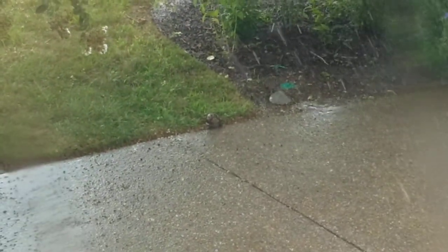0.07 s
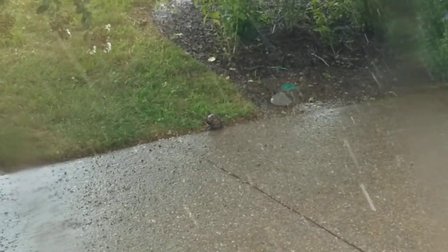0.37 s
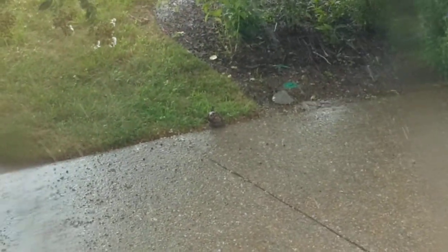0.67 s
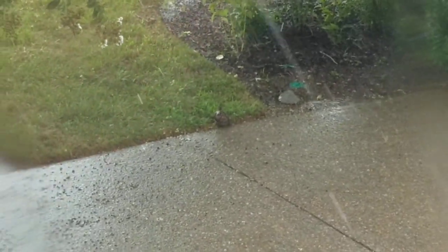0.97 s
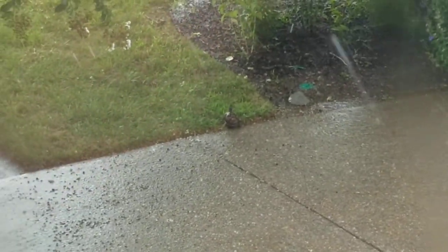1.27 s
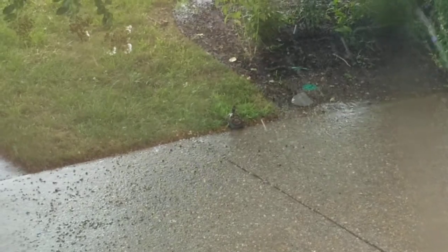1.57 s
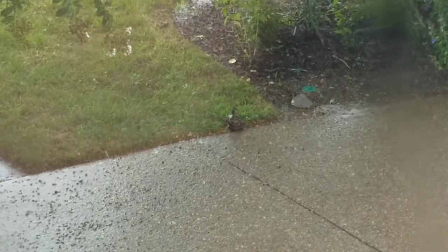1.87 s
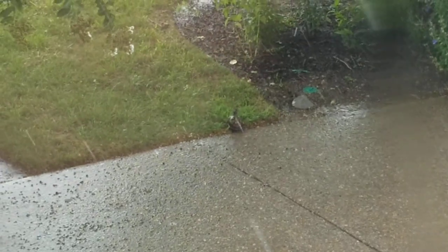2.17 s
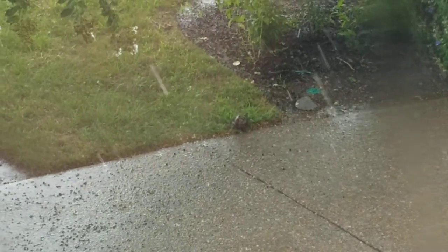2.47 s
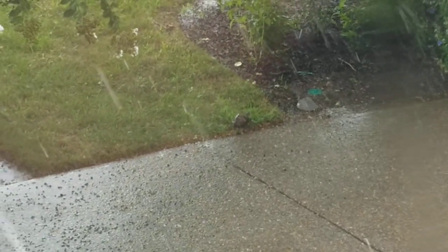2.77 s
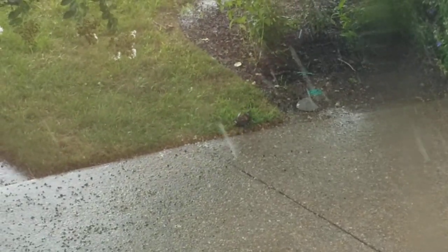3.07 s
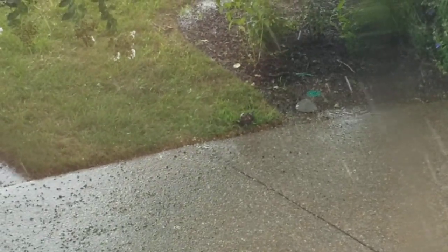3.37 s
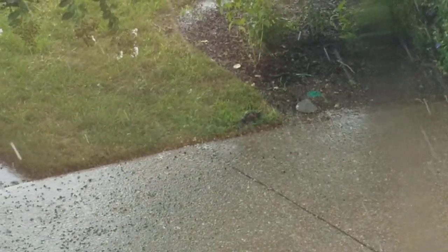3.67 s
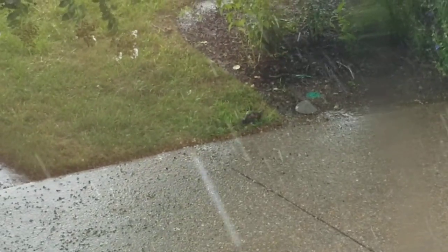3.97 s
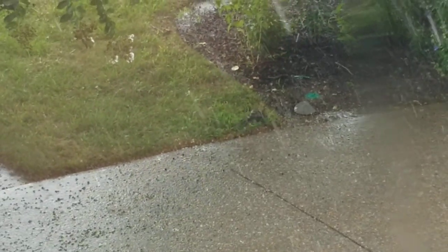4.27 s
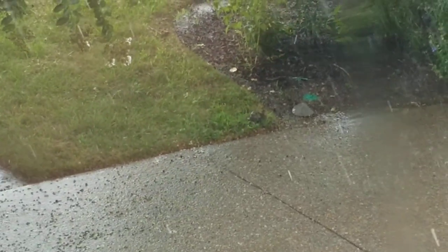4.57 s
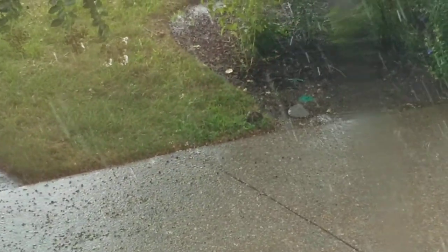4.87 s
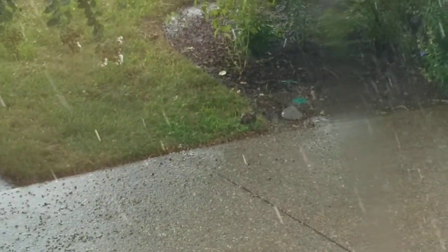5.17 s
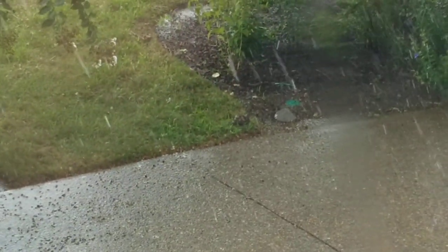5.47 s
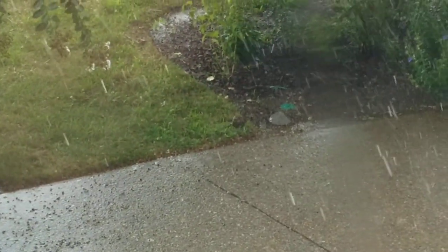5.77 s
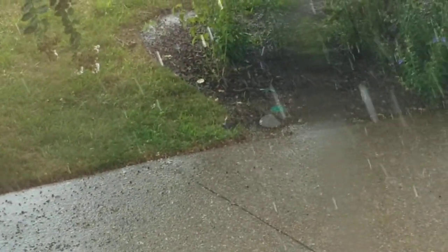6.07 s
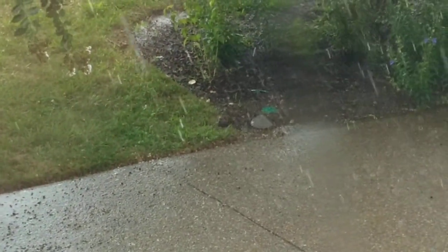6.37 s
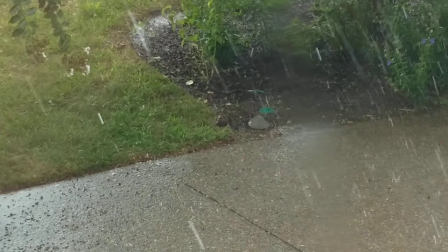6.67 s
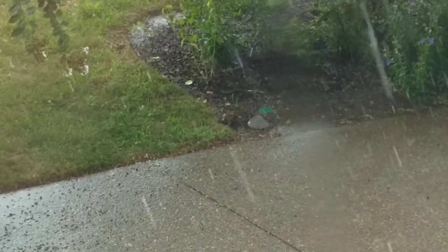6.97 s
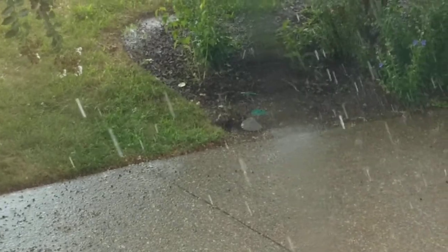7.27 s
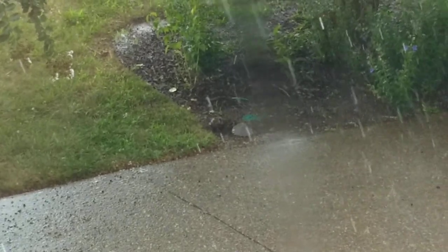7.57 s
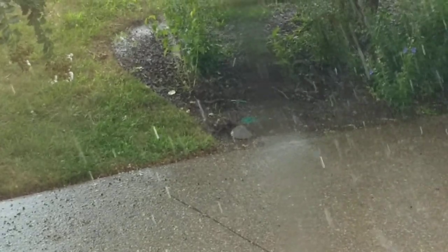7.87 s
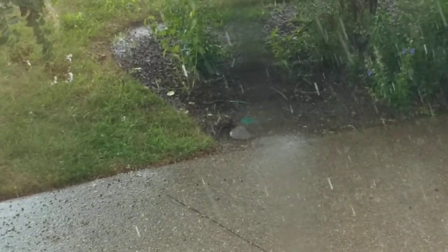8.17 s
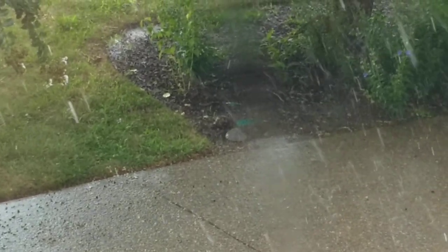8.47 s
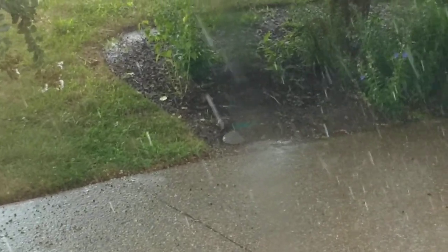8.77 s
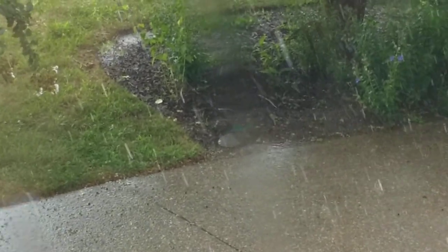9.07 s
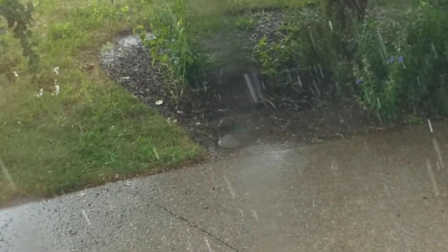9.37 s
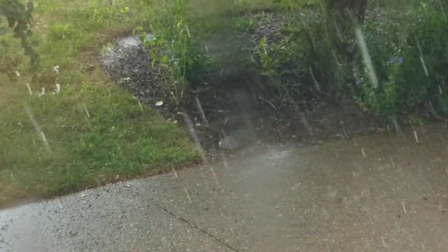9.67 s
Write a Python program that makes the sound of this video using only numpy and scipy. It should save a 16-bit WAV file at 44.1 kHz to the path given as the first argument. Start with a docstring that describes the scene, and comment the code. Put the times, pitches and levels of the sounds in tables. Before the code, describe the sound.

Heavy rain falls steadily, heard from a room behind a closed window. A hollow, throbbing rumble fills the room while drops patter dully on the pane and spray hisses softly on the driveway. Faint splats and plinking drips come now and then, over a barely audible appliance hum. Later the rain swells a little, and the hand-held microphone picks up a tick and knock, then several soft thuds.

```python
"""A room behind a closed window, in steady heavy rain that swells a little towards the end.
Countless impacts on the house excite the room's standing waves into a hollow, throbbing rumble.
Drops patter at the window, whose pane dulls them and drones; spray hisses on the driveway, and
nearby fat drops splat and drips plink. Indoors an appliance hums, and a hand-held camera ticks
and thuds softly under shifting fingers."""
import sys
import numpy as np
from scipy import signal
from scipy.fft import rfft, irfft, next_fast_len
from scipy.io import wavfile
from scipy.ndimage import map_coordinates

SR = 44100
rng = np.random.default_rng(int(sys.argv[2]) if len(sys.argv) > 2 else 0)


def persist_wave(psi):
    """Save psi, clipped to +-1, as 16-bit WAV."""
    counts = np.round(np.clip(psi, -1, 1) * 32767).astype(np.int16)
    wavfile.write(sys.argv[1], SR, np.atleast_2d(counts).T)


N = 428652

# strength of the rain in the gusts, about its usual value: t/s, level/dB
RAIN_STRENGTH = [(0, -1.2), (0.35, -3), (0.8, -1.3), (1.05, -1.3), (1.35, -3.5), (2.0, -0.5), (2.5, -1.5),
                 (3.9, -1), (5.5, -0.25), (6.6, 0.2), (6.9, -0.6), (7.3, 2), (8.0, -0.6), (8.45, 0.5),
                 (9.72, 0)]
# spectra of the noise sources: f/Hz, relative spectral level/dB
MIC_HISS_SPECTRUM = [(20, 1), (8000, -1.5), (15500, 0)]
SPLASH_SPECTRUM = [(800, -19), (2100, -3.5), (2700, 1.5), (3400, -1.5), (5000, 0.5), (6000, 0),
                   (7000, -3.5), (8300, -7), (11000, -13), (15500, -21)]
PANE_SPECTRUM = [(300, -27), (460, 0), (740, -2), (950, -19), (2000, -60)]
PATTER_SPECTRUM = [(200, -19), (400, -9), (470, -0.5), (540, -.5), (640, -4), (760, -2), (870, -8.5),
                   (1150, -9.5), (1350, -15), (1530, -13), (1950, -19), (2600, -21), (4000, -50)]
DRUM_SPECTRUM = [(20, -70), (32, -39), (43, -19), (55, -9), (95, -6), (160, -6), (255, -6.5), (310, -8),
                 (400, -13), (600, -36.5), (1200, -67)]
# standing waves of the room, and resonances in the spray's hiss: f/Hz, width/Hz, lift/dB
ROOM_MODES = [(59.5, 5, 6), (98, 13, 8.5), (125, 7, 7), (142, 11, 8), (168, 7, 2.5), (187, 15, 6),
              (212, 14, 7), (241, 9, 7), (262, 12, 4.5), (303, 12, 3), (349, 14, 3), (465, 30, 1.5),
              (528, 20, 2.5)]
SPLASH_MODES = [(3830, 220, 5), (4360, 160, 7.5), (4600, 90, 3), (4850, 130, 4), (5550, 200, 2.5),
                (5900, 150, 1.5)]
# reverberation time of the room: f/Hz, t60/s
ROOM_DECAY = [(200, 0.75), (2000, 0.32), (10000, 0.046)]
# dry ticks at the camera, and fat drops near the window: t/s, level/dB, f/Hz, width/octaves, t60/s
CAMERA_TICKS = [(4.942, -53.5, 10200, .17, .05), (7.1402, -46, 14500, .5, .012),
                (7.1402, -44.5, 2800, 1, .007)]
SPLATS = [(.510, -57.5, 4200, .5, .09), (.795, -56.5, 1550, .2, .09), (.801, -58, 5600, .15, .04),
          (.910, -60, 6050, .07, .03), (1.683, -59.5, 5600, .25, .05), (1.867, -53.5, 1300, .3, .1),
          (1.983, -57, 7400, .18, .04), (2.051, -56, 4900, .45, .13), (2.237, -58, 1550, .25, .16),
          (3.224, -56.5, 1700, .18, .08), (3.340, -53, 1350, .25, .07), (3.668, -59.5, 3750, .12, .09),
          (4.489, -55, 5500, .5, .03), (4.519, -56, 1550, .25, .06), (4.572, -56.5, 1400, .35, .12),
          (4.633, -55, 1450, .3, .03), (5.690, -58, 4600, .18, .05), (5.780, -59.5, 3550, .15, .16),
          (6.240, -62, 3650, .14, .05), (6.323, -53.5, 1450, .4, .05), (6.6105, -49, 4500, .6, .015),
          (6.6125, -39, 1200, .8, .015), (6.620, -61, 3650, .2, .12), (6.626, -54, 1200, .4, .07),
          (7.093, -58, 5400, .25, .025), (7.238, -56, 5600, .2, .06), (7.663, -55.5, 5300, .27, .07),
          (8.165, -59.5, 3870, .05, .07), (8.169, -57, 5700, .12, .04), (8.415, -55, 1580, .26, .1),
          (9.213, -56, 1400, .25, .1)]
# finger nudges on the camera body: t/s, level/dB
NUDGES = [(3.235, -33), (7.1405, -20), (7.188, -24), (8.149, -26), (8.24, -29), (8.33, -29), (8.585, -28),
          (8.725, -28), (8.795, -28), (8.895, -27)]
# drips from the eaves: t/s, level/dB, f/Hz, t60/s
DRIPS = [(1.437, -48, 900, .025), (2.756, -46, 1240, .03), (4.368, -50.5, 1170, .04),
         (4.516, -42.5, 1120, .045), (4.632, -41, 590, .04), (5.239, -51, 1580, .04),
         (7.263, -44.5, 1190, .05), (7.283, -48, 1000, .04), (7.314, -38, 630, .04), (8.010, -40, 720, .03)]
# crests of single standing waves: t/s, level/dB, f/Hz
THROBS = [(.03, -46.5, 141), (.55, -52.5, 141), (.85, -52.5, 259), (.9, -53.5, 141), (1.05, -50, 241),
          (2.6, -50, 98), (3.22, -50, 98), (4.18, -50, 98), (4.32, -51, 141), (7.17, -49, 141),
          (7.58, -50, 212), (7.72, -49.5, 98), (8.45, -49, 212), (8.7, -49.5, 98), (9.43, -47.5, 141)]
# likeness of left and right before widening: f/Hz, coherence/1
COHERENCE = [(30, .2), (90, .45), (140, .6), (215, .8), (300, .58), (390, .6), (480, .9), (800, .89),
             (1150, .98), (1420, .5), (1700, -.1)]
# lead of left over right: f/Hz, phase/rad
PHASE_LEAD = [(50, 1.2), (75, -0.33), (140, 0.14), (215, -0.17), (300, 1.3), (400, 0.25), (850, 0.56),
              (1150, -0.057), (1450, -0.00038), (2000, -0.061)]
# left minus right: f/Hz, level/dB
BALANCE = [(100, 0), (250, 1.5), (500, 0), (1500, 0.7), (2500, -0.4), (5000, -1.1), (9000, -2),
           (14000, -2.5)]
# depth of the stereo-widening comb: f/Hz, depth/1
COMB_DEPTH = [(1600, 0.018), (2000, 0.97), (3500, 0.89), (5800, 0.74), (8000, 0.47), (11500, 0.65),
              (14500, 0.46)]
# teeth of that comb: f/Hz, spacing/Hz
COMB_SPACING = [(2300, 2320), (7000, 2345), (14400, 2400)]

OPPOSITE = np.array([[1], [-1]])  # signs for left and right
QUADRATURE = OPPOSITE * np.pi / 4  # phases a quarter cycle apart


def amp(db):
    """Amplitude ratio of a level in decibels."""
    return 10 ** (np.asarray(db) / 20)


def unit(x):
    """Normalisation to rms 1."""
    return x / np.sqrt(np.mean(x ** 2) + 1e-20)


def along(points, hz):
    """Interpolation of (f, value) points on a logarithmic frequency axis."""
    f, values = np.transpose(points)
    return np.interp(np.log(hz + 1), np.log(f + 1), values)


def wobble(rate):
    """Slow random modulation: a spline through rate knots a second."""
    knots = rng.standard_normal(int(N * rate / SR) + 4)
    return map_coordinates(knots, [np.arange(N) * rate / SR])


def noise():
    """White noise, incoherent between the channels."""
    return rng.standard_normal((2, N))


def filtered(x, response):
    """Linear filtering: the spectrum of x times a frequency response."""
    n = x.shape[-1]
    padded = next_fast_len(n + 8192)
    return irfft(rfft(x, padded) * response(np.fft.rfftfreq(padded, 1 / SR)), padded)[..., :n]


def coloured(x, spectrum, modes=()):
    """Source and filter: x takes a broad spectrum with a peak at each resonance, at rms 1."""
    def lift_db(hz):
        return sum(db / (1 + (2 * (hz - centre) / width) ** 2) for centre, width, db in modes)
    return unit(filtered(x, lambda hz: amp(along(spectrum, hz) + lift_db(hz))))


def add(track, s, sound):
    """Superposition of a sound on the track, from s seconds on."""
    part = track[:, round(s * SR):][:, :sound.shape[-1]]
    part += sound[..., :part.shape[-1]]


def bursts(rows):
    """Broadband transients: each impact is a band of noise that decays exponentially."""
    track, t = np.zeros((2, N)), np.arange(SR // 4) / SR
    for s, db, pitch, octaves, t60 in rows:
        band = lambda hz: np.exp(-.5 * (np.log2((hz + 1) / pitch) / octaves) ** 2)
        band_noise = unit(filtered(rng.standard_normal((2, len(t))), band))
        add(track, s, amp(db - 60 * t / t60) * band_noise)
    return track


def rings(rows, attack_s=.0004):
    """Damped free vibration: each impact rings at one frequency."""
    track, t = np.zeros((2, N)), np.arange(SR // 4) / SR
    for s, db, pitch, t60 in rows:
        envelope = amp(db - 60 * t / t60) * (1 - np.exp(-t / attack_s))
        add(track, s, envelope * np.sin(2 * np.pi * pitch * t + QUADRATURE))
    return track


def shower(count, low_hz, high_hz, t60, spread_db, samples):
    """Shot noise: drops ring briefly at random times and pitches, with a random phase at each ear."""
    t = np.arange(samples) / SR
    when, pitch, distance, *phases = rng.random((count, 5)).T[:, :, None]
    # most drops are far and faint, a few are near
    envelopes = amp(-spread_db * np.log(distance + 1 / 200) - 60 * t / t60)
    angle = 2 * np.pi * (low_hz + pitch * (high_hz - low_hz)) * t
    index = ((when * N).astype(int) + np.arange(samples)).ravel()
    ears = [envelopes * np.sin(angle + 2 * np.pi * phase) for phase in phases]
    return unit(np.array([np.bincount(index, ear.ravel(), N)[:N] for ear in ears]))


def flurries(count, spread_db, t60):
    """Incoherent energies add: a gain of rms 1 that jumps at each larger splash and sinks back."""
    when, distance = rng.random((count, 2)).T
    strength = amp(-spread_db * np.log(distance + 1 / 100))
    energy = np.bincount((when * N).astype(int), strength ** 2, N)
    retained = amp(-60 / (t60 * SR)) ** 2
    return unit(np.sqrt(signal.lfilter([1], [1, -retained], energy)))


def in_room(x, wet_db):
    """Reverberation: convolution adds a diffuse tail in which the treble dies first."""
    hz, t, spectra = signal.stft(rng.standard_normal((2, SR // 3)), SR, nperseg=256)
    decay = amp(-60 * t / along(ROOM_DECAY, hz)[:, None])
    _, tail = signal.istft(spectra * decay, SR, nperseg=256)
    echo = signal.fftconvolve(x, tail / np.linalg.norm(tail[0]), axes=1)[:, :N]
    return x + amp(wet_db) * echo


def microphones(air):
    """Partial coherence: two close ports hear low notes much alike; stereo widening combs the treble."""
    comb = lambda hz: along(COMB_DEPTH, hz) * np.cos(2 * np.pi * hz / along(COMB_SPACING, hz))
    coherence = lambda hz: np.clip(along(COHERENCE, hz) - comb(hz), -1, 1)
    mid_side = (air[0] + OPPOSITE * air[1]) / 2
    mid, side = filtered(mid_side, lambda hz: np.sqrt(1 + OPPOSITE * coherence(hz)))
    balance = lambda hz: amp(OPPOSITE * along(BALANCE, hz) / 2)
    phase_shift = lambda hz: np.exp(.5j * OPPOSITE * along(PHASE_LEAD, hz))
    return filtered(mid + OPPOSITE * side, lambda hz: balance(hz) * phase_shift(hz))


def microphone_hiss():
    """Self-noise of the microphones: a faint, nearly white floor."""
    return amp(-64.5) * coloured(noise(), MIC_HISS_SPECTRUM)


def appliance_hum(hz, db):
    """A pure tone, made unsteady by slight modulation of phase and amplitude."""
    phase = 2 * np.pi * hz * np.arange(N) / SR + 0.21 * wobble(1.9)
    return amp(db + 1.1 * wobble(3)) * np.sin(phase)


def camera_knock(s, db, hz, t60):
    """Heavy damping cuts the ring of the camera body to a dull knock."""
    return rings([(s, db, hz, t60)])


def finger_nudges(hz=125, attack_s=.002, t60=0.058, push=.3):
    """Structure-borne sound: a nudge shakes and pushes the camera, driving its ports in antiphase."""
    track, t = np.zeros((2, N)), np.arange(SR // 8) / SR
    envelope = amp(-60 * t / t60) * (1 - np.exp(-t / attack_s))
    thud = envelope * (np.sin(2 * np.pi * hz * t) + push)
    for s, db in NUDGES:
        add(track, s, amp(db) * OPPOSITE * thud)
    return track


def drips():
    """Damped oscillation: drips from the eaves plink or plop, with little reverberation."""
    return in_room(rings(DRIPS), wet_db=-12)


def splats():
    """Impact noise: fat drops burst close by and reverberate in the room."""
    return in_room(bursts(SPLATS), wet_db=-2)


def driveway_splashes(rain_db):
    """Superposition on driveway and leaves: even hiss, droplets, pings on something hard, and spray."""
    droplets = shower(count=6000, low_hz=3030, high_hz=10560, t60=0.0043, spread_db=3.0, samples=192)
    pings = shower(count=1800, low_hz=3300, high_hz=6300, t60=0.06, spread_db=1.0, samples=2000)
    spray = noise() * flurries(count=900, spread_db=2.0, t60=0.17)
    hiss = noise() + amp(-18) * droplets + amp(-16) * pings + amp(-4) * spray
    level_db = -60.5 + 0.7 * rain_db + 0.72 * wobble(9)
    return amp(level_db) * coloured(hiss, SPLASH_SPECTRUM, SPLASH_MODES)


def pane_drone(rain_db):
    """Forced vibration: gusts drive rain against the glass, whose drone grows steeply with them."""
    return amp(-61.5 + 2.6 * rain_db) * coloured(noise(), PANE_SPECTRUM, ROOM_MODES)


def window_patter(rain_db):
    """Transmission loss: the pane dulls the knocks of near drops and the wash of farther ones."""
    near = shower(count=1500, low_hz=880, high_hz=1904, t60=0.014, spread_db=2.5, samples=800)
    level_db = -52 + 0.71 * rain_db + .7 * wobble(7)
    return amp(level_db) * coloured(noise() + amp(-17.5) * near, PATTER_SPECTRUM, ROOM_MODES)


def throbs(sigma_s=.085):
    """Resonance: single standing waves build up and ebb under a Gaussian envelope."""
    track, t = np.zeros((2, N)), np.arange(N) / SR
    for crest_s, db, pitch in THROBS:
        near = np.abs(t - crest_s) < .5
        offset_s = t[near] - crest_s
        envelope = amp(db) * np.exp(-.5 * (offset_s / sigma_s) ** 2)
        phase = 2 * np.pi * (pitch * offset_s + rng.random())
        track[:, near] += envelope * np.sin(phase + QUADRATURE)
    return track


def house_drumming(rain_db):
    """Modal excitation: drops on roof and walls merge into a rumble that fills the room's modes."""
    level_db = -47 + 1.12 * rain_db + 0.34 * wobble(6.8)
    return amp(level_db) * coloured(noise(), DRUM_SPECTRUM, ROOM_MODES)


def scene():
    """Common modulation: one rain strength drives the four continuous rain layers; the rest is added."""
    rain_db = np.interp(np.arange(N) / SR, *np.transpose(RAIN_STRENGTH))
    house = house_drumming(rain_db) + throbs()
    window = window_patter(rain_db) + pane_drone(rain_db)
    outside = driveway_splashes(rain_db) + splats() + drips()
    noise_floor = microphone_hiss()
    camera = bursts(CAMERA_TICKS) + camera_knock(s=7.140, db=-26.5, hz=800, t60=.004)
    hum = appliance_hum(hz=74.2, db=-59.5)
    return microphones(house + window + outside + hum + camera + noise_floor) + finger_nudges()


def record(dry):
    """Band limiting: the camera passes nothing above its cutoff."""
    cutoff_hz = 15520
    return filtered(dry, lambda hz: hz < cutoff_hz)


dry = scene()
out = record(dry)
persist_wave(out)
```